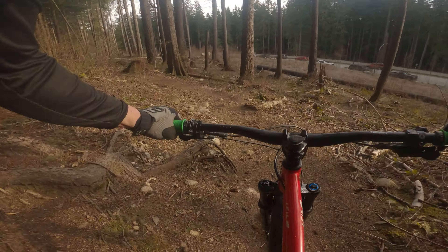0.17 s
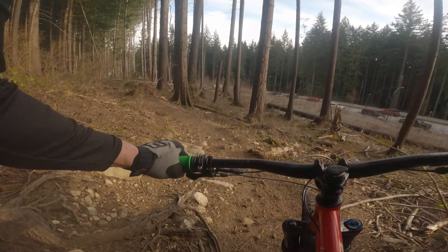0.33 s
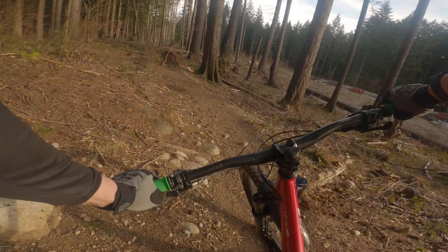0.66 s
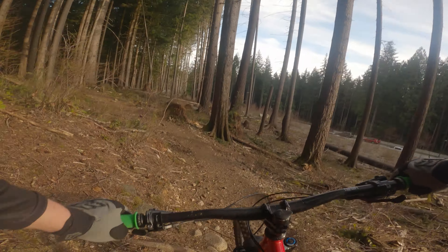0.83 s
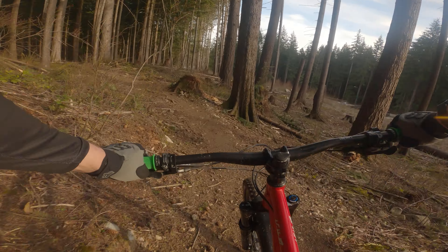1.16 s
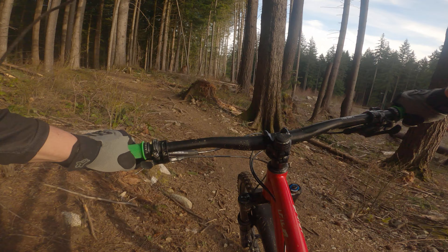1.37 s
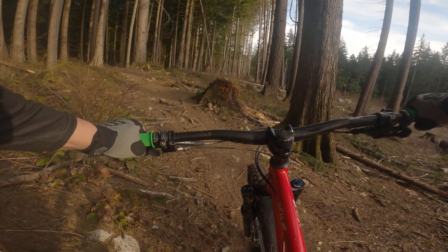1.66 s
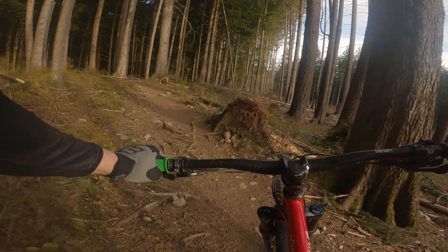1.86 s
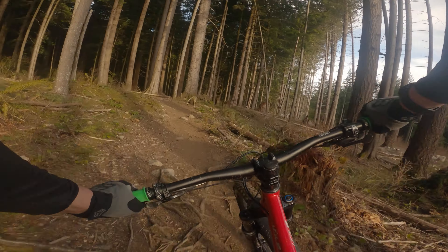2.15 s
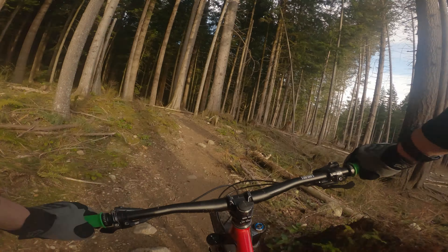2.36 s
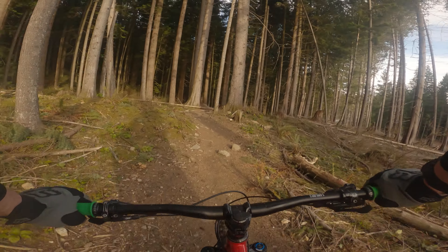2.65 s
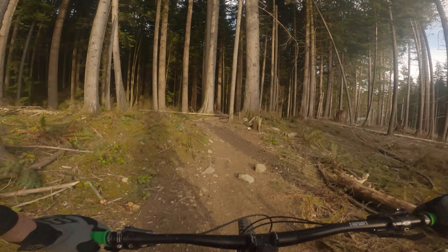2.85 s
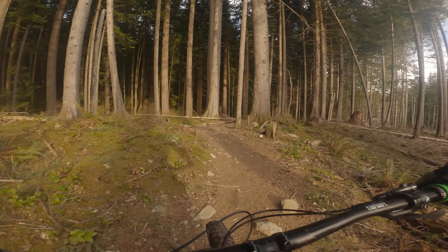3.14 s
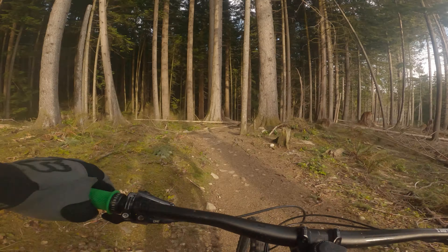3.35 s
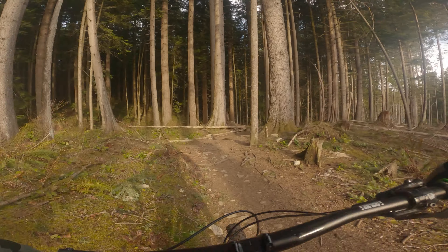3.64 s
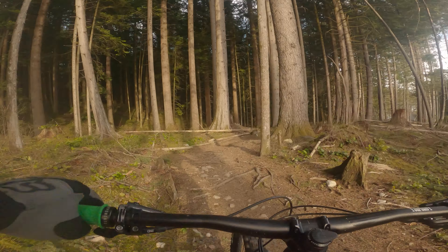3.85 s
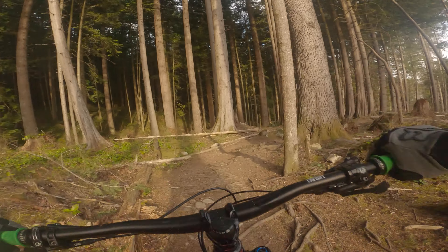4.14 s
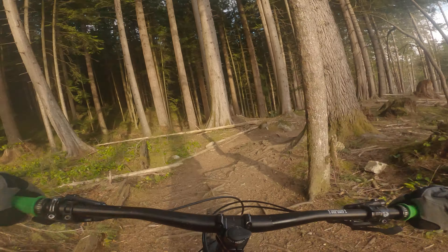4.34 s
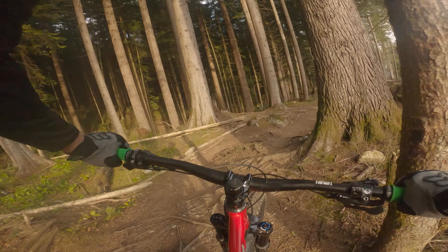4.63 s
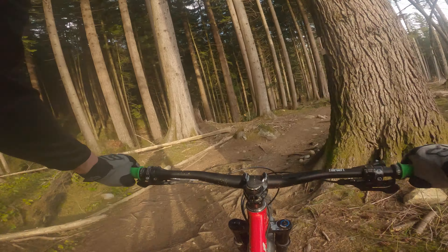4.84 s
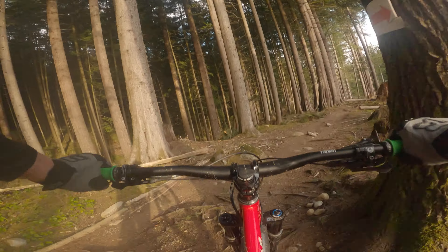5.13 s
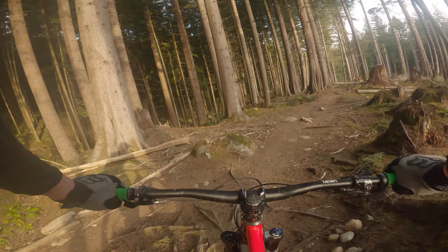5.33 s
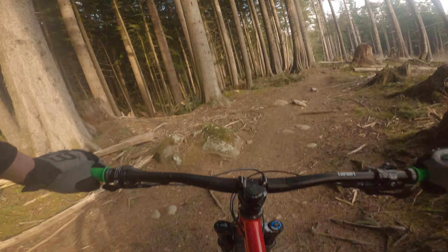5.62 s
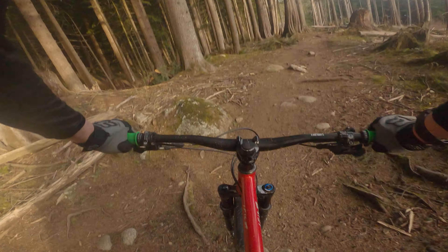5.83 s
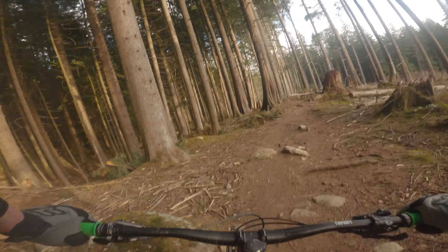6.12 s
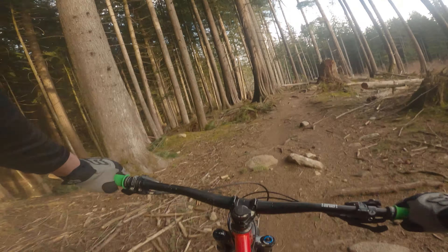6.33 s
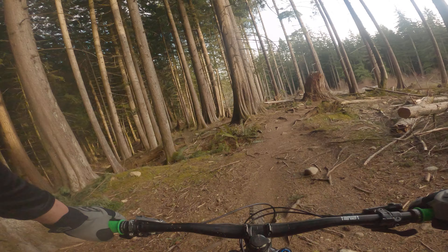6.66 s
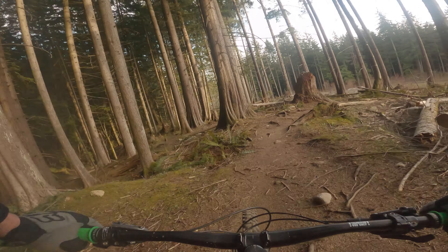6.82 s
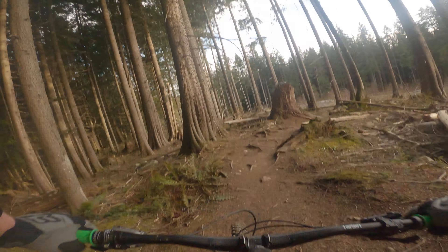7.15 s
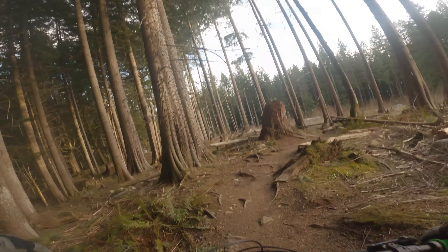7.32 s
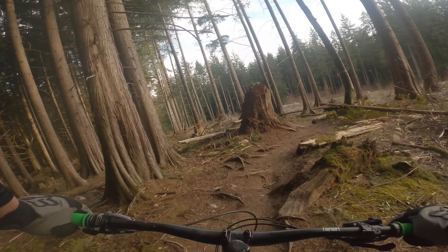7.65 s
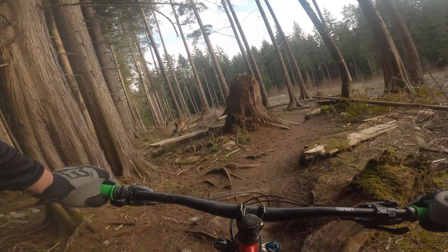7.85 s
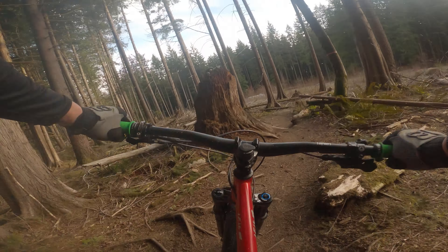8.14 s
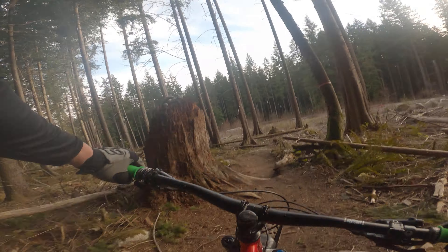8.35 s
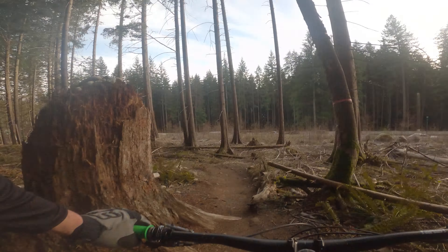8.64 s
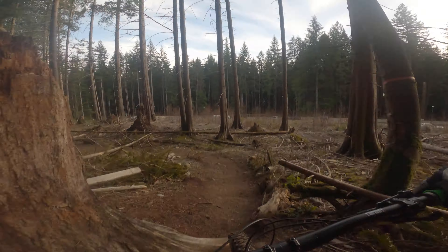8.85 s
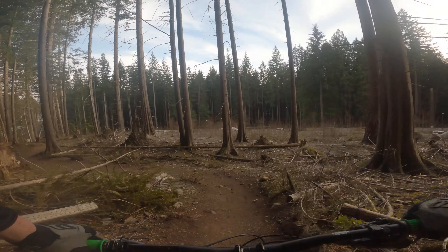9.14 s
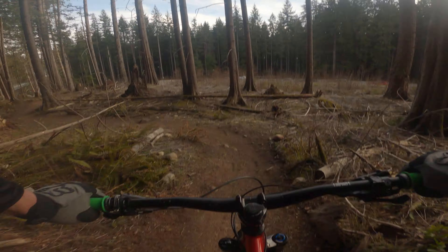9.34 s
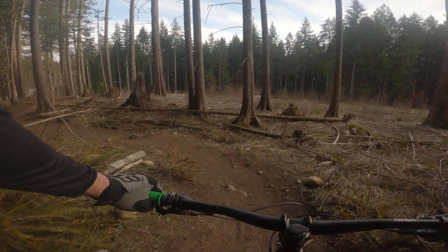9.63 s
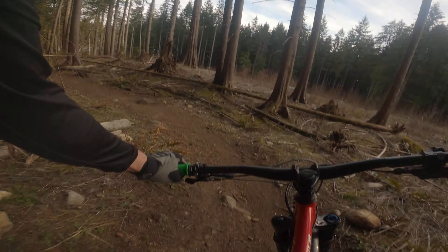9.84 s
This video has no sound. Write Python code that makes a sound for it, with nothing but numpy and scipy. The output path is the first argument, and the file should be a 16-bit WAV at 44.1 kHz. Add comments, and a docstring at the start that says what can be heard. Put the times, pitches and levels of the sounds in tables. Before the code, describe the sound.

Hollow plastic knocks and irregular chatter from a jolted camera mount, over low rumbling wind gusts, airy hiss and gritty tyre crunch on a forest trail.

```python
"""On a rooty dirt trail, a mountain bike rattles along, heard by a camera strapped to the rider's chest.
Wind is shaped noise in gusts; tyres crunch, fizz and snap, made from gritty noise and short bursts.
Every jolt knocks the camera in its mount: a dying chatter sets off the mount's resonances.
Air rush and crunch ring in the camera's case. Sharp ticks, likely from clipping, are bright noise bursts.
Loud knocks make a limiter duck the rest."""
import sys
import numpy as np
from scipy import signal
from scipy.fft import rfft, irfft, next_fast_len
from scipy.io import wavfile
from scipy.ndimage import uniform_filter1d, minimum_filter1d, map_coordinates

SR = 44100
rng = np.random.default_rng(int(sys.argv[2]) if len(sys.argv) > 2 else 0)


def master_out(mix):
    """Clip the mix to full scale and print it as 16-bit PCM to the path in sys.argv[1]."""
    frames = np.transpose(np.atleast_2d(mix))
    ceiling = np.clip(frames, -1, 1)
    pcm = np.round(ceiling * 32767).astype(np.int16)
    wavfile.write(sys.argv[1], SR, pcm)


N = 440118  # length in samples

# how the ride goes: t/s, level of the air rush before gusts sway it/dB, level of the tyre crunch/dB
RIDE = [(0.0, -20, -33.5), (.15, -24, -34.5), (.26, -21, -39.5), (.41, -24.5, -35), (0.48, -23, -36),
        (0.54, -12.5, -27), (0.65, -27, -39.5), (1.28, -25, -40), (2.05, -23.5, -37), (2.24, -17, -36),
        (2.67, -31.5, -37.5), (3.19, -26, -42.5), (3.41, -22, -42.5), (4.48, -24.5, -36.5),
        (4.99, -21.5, -37), (5.16, -22, -38), (5.59, -24.5, -36.5), (5.8, -22, -36), (6.08, -32, -44.5),
        (6.22, -28, -42), (6.4, -31, -46), (7.2, -27.5, -39), (7.28, -25, -34), (7.36, -36, -44),
        (7.72, -24, -42.5), (8.13, -29.5, -38), (8.21, -18.5, -37), (8.28, -19, -30.5), (8.38, -24, -37.5),
        (8.6, -26, -37), (8.87, -24.5, -40), (9.1, -31, -44.5), (9.28, -26.5, -35), (9.42, -25, -39),
        (9.58, -23.5, -37.5), (9.8, -30.5, -38), (9.9, -25, -46), (9.98, -23, -36.5)]
# resonances of the camera's case and its microphone port: f/Hz, width/Hz, level/dB
CASE = [(912, 432, -5.5), (1168, 248, 1.5), (1950, 1890, -7), (3390, 797, -1), (4580, 290, -6.5),
        (5650, 560, -7.5)]


def amp(db):
    """Turn decibels into a plain factor."""
    return 10 ** (np.asarray(db) / 20)


def unit(x):
    """Scale x to an RMS of one."""
    return x / np.sqrt(np.mean(x ** 2) + 1e-20)


def levels(rows):
    """Draw straight lines between table rows: one curve for each column after the time."""
    s, *cols = np.transpose(rows)
    return [np.interp(np.arange(N) / SR, s, db) for db in cols]


def wobble(rate):
    """A smooth random curve through `rate` random points a second."""
    points = rng.standard_normal(int(N * rate / SR) + 4)
    return map_coordinates(points, [np.arange(N) * rate / SR])


def filtered(x, gain_at):
    """Filter x by multiplying its spectrum with gain_at(frequency in Hz)."""
    m = next_fast_len(N + SR // 2)  # spare room at the end lets the ringing die out
    return irfft(rfft(x, m) * gain_at(np.fft.rfftfreq(m, 1 / SR)), m)[..., :N]


def coloured(x, points):
    """Shape the spectrum of x through (Hz, dB) points on a log axis, almost silent beyond the ends."""
    hz, db = np.transpose(points)
    return filtered(x, lambda f: amp(np.interp(np.log(f + 1), np.log(hz + 1), db, -120, -120)))


def response(modes, f):
    """Add up resonances that ring only after they are struck; neighbours have opposite signs."""
    total = 0
    for k, (centre, width, db) in enumerate(modes):
        damping = 1j * f * width
        total = total + (-1) ** k * amp(db) * damping / (centre * centre - f * f + damping)
    return total


def resonant(x, modes):
    """Let x ring through a set of resonances."""
    return filtered(x, lambda f: response(modes, f))


def gritty(rate, spread_db, share):
    """Mix smooth noise with sparse single clicks of uneven size; share is the clicks' part of the power."""
    hit = rng.random(N) < rate / SR
    grains = hit * amp(spread_db * rng.standard_normal(N)) * rng.choice([-1, 1], N)
    share = np.clip(share, 0, 1)
    return np.sqrt(1 - share) * rng.standard_normal(N) + np.sqrt(share) * unit(grains)


def patchy(x, depth_db):
    """Make small random patches of x louder or softer, across both time and frequency."""
    z = signal.stft(x, nperseg=256)[2]
    field = uniform_filter1d(rng.standard_normal(z.shape), size=4, axis=0)
    field = uniform_filter1d(field, size=10, axis=1)
    return signal.istft(z * amp(depth_db * unit(field)), nperseg=256)[1][:N]


def gusts_db():
    """Wind strength in dB: the power of each gust adds to that of the calmer wind between them."""
    # wind between the gusts: t/s, level/dB
    lull = [(0.0, -22.5), (2.64, -27), (3.22, -21.5), (3.67, -16), (5.72, -17), (6.42, -25.5), (8.45, -19),
            (9.01, -30.5), (9.59, -14.5), (9.98, -24)]
    # gusts: t of the peak/s, peak level/dB, length/s
    gusts = [(0, -11, 0.1), (0.196, -13, 0.19), (0.33, -9.5, 0.19), (0.577, -7, 0.16), (0.828, -12.5, 0.13),
             (1.075, -12, 0.35), (1.242, -16, 0.31), (1.435, -10, 0.067), (1.613, -12, 0.4),
             (1.685, -13, 0.06), (1.784, -12.5, 0.2), (2.006, -11.5, 0.21), (2.226, -12, 0.62),
             (2.391, -1, 0.085), (2.631, -4.5, 0.2), (2.926, -10.5, 0.2), (3.223, -13.5, 0.04),
             (3.42, -14.5, 0.14), (3.562, -14.5, 0.31), (3.836, -7, 0.13), (3.987, -9.5, 0.21),
             (4.127, -14, 0.9), (4.326, -13.5, 0.22), (4.4, -12.5, 0.081), (4.596, -17.5, 0.11),
             (4.869, -8, 0.19), (4.97, -12.5, 0.24), (5.204, -12, 0.14), (5.518, -13.5, 0.77),
             (5.747, -12, 0.17), (5.994, -13.5, .17), (6.192, -22.5, 0.37), (6.419, -17.5, 0.16),
             (7.002, -16.5, 0.37), (7.248, -14.5, 0.23), (7.582, -18.5, .3), (7.905, -19.5, 0.13),
             (8.18, -15.5, 0.36), (8.478, -12.5, 0.18), (8.74, -14, 0.18), (8.883, -18.5, 0.26),
             (9.172, -12.5, 0.28), (9.477, -15, 0.21), (9.622, -19, 0.43), (9.98, -15.5, 0.17)]
    edge_db = 11.5  # fall from the peak to half a length away on each side
    t = np.arange(N) / SR
    power = amp(2 * levels(lull)[0])
    for s, db, length in gusts:
        near = slice(max(round((s - length) * SR), 0), round((s + length) * SR))
        fall_db = edge_db * np.abs(2 * (t[near] - s) / length) ** 1.22
        power[near] += amp(2 * (db - fall_db))
    return 10 * np.log10(power)


def wind_buffet(lumps, gust_db):
    """Eddies push the microphone's diaphragm in deep lumps."""
    # colour of the buffeting: f/Hz, relative level/dB
    colour = [(9, -24), (15, 1.5), (43, 4.5), (80, 1), (130, -10), (220, -49.5)]
    noise = coloured(rng.standard_normal(N), colour)
    return amp(gust_db - 2.0) * unit(amp(0.95 * lumps) * noise)


def wind_roar(lumps, gust_db):
    """A higher roar that grows faster than the buffeting as the wind gets stronger."""
    # colour of the roar: f/Hz, relative level/dB
    colour = [(50, -26), (90, 0), (130, -1), (200, -7), (260, -6), (400, -23.5), (600, -26)]
    unsteady = amp(2.1 * lumps + 0.77 * wobble(5) + 1.8 * wobble(30))
    noise = coloured(rng.standard_normal(N), colour)
    return amp(1.392 * gust_db - 0.82) * unit(unsteady * noise)


def air_rush(lumps, gust_db):
    """Air hisses in flutters and rings in the camera's case; gusts lift it a little."""
    # colour of the hiss before the case: f/Hz, relative level/dB
    colour = [(150, -42), (250, 3), (400, 3.5), (700, -6.5), (1200, -8), (2000, -29), (2800, -56.5)]
    follows_gusts = 0.24  # dB per dB
    flutter = amp(2.0 * lumps + 0.38 * wobble(25) + 1.04 * wobble(70))
    grit = patchy(gritty(rate=250, spread_db=3.0, share=0.28), depth_db=1.5)
    rush = unit(resonant(coloured(flutter * grit, colour), CASE))
    rush_db = levels(RIDE)[0] + follows_gusts * (gust_db - gust_db.mean())
    return amp(rush_db) * rush


def wind():
    """Buffeting, roar and air rush share the same lumps and gusts."""
    lumps = wobble(12)
    gust_db = gusts_db()
    return wind_buffet(lumps, gust_db) + wind_roar(lumps, gust_db) + air_rush(lumps, gust_db)


def tyre_grind():
    """Knobs crush grit and needles: a clumpy crunch that rings in the case, and a more even fizz above."""
    # colour of the crunch before the case: f/Hz, relative level/dB
    crunch_colour = [(1200, -31), (1800, 0.5), (2300, 0), (2720, -7.5), (3100, -1.5), (4000, 0.5),
                     (5050, -0.5), (5700, -2), (7000, 0.5), (9000, -21), (12000, -60.5)]
    # colour of the fizz: f/Hz, relative level/dB
    fizz_colour = [(6000, -18), (7500, 2.5), (10000, -3.5), (12500, -8.5), (14000, -13), (15700, -23)]
    # fizz, dull over the soft stretch: t/s, level/dB
    fizz_level = [(0, -53), (.2, -56.5), (.7, -60.5), (1.3, -61), (1.8, -58), (3.12, -58), (3.22, -67.5),
                  (4.2, -65), (4.4, -56), (5.8, -59.5), (6.1, -68), (6.7, -62), (6.9, -59.5), (7.6, -62),
                  (8.35, -57.5), (8.75, -64), (9.3, -60.5), (9.98, -61)]
    grit = patchy(gritty(rate=220, spread_db=4, share=0.28), depth_db=2.2)
    clumps = 1.85 * wobble(27) + 0.97 * wobble(40)
    crunch = unit(resonant(coloured(amp(clumps) * grit, crunch_colour), CASE))
    fizz = unit(coloured(amp(0.33 * clumps) * grit, fizz_colour))
    return amp(levels(RIDE)[1]) * crunch + amp(levels(fizz_level)[0]) * fizz


def twig_snaps():
    """Single snaps under the tyres: quickly fading noise bursts that set off a few resonances."""
    # snaps: t/s, relative level/dB, time to fall by 20 dB/ms
    twigs = [(0.408, -22, 17), (0.575, -12.5, 8.5), (1.4534, -21, 20), (2.34, -20.5, 12), (3.45, -21, 7.1),
             (3.764, -25, 3.3), (3.801, -18, 3.1), (3.962, -21, 3), (4.342, -26, 7.5), (5.151, -20.5, 10),
             (6.723, -26, 8.5), (6.962, -24.5, 7)]
    # resonances of a snap: f/Hz, width/Hz, level/dB
    snap_modes = [(3230, 550, 8), (4750, 1100, 4.5), (6400, 1700, -8), (11000, 4000, -33)]
    out, t = np.zeros(N + SR), np.arange(SR // 20) / SR
    onset = 1 - np.exp(-t / 0.00093)  # rises over about a millisecond
    for s, db, ms in twigs:
        fade = amp(db + 2.5 - 20 * 1000 * t / ms)
        out[round(s * SR):][:len(t)] += fade * onset * rng.standard_normal(len(t))
    return resonant(out[:N], snap_modes)


def tyres():
    """All the tyre sounds: steady grinding and single snaps."""
    return tyre_grind() + twig_snaps()


def clip_ticks():
    """Sharp ticks in hard knocks, likely from clipping: very short bright bursts of noise."""
    # ticks: t/s, relative level/dB
    tick_rows = [(0.4968, -36), (0.8305, -45), (1.1338, -44), (1.4536, -36), (1.8637, -40.5), (2.8175, -39),
                 (5.0135, -39.5), (5.8975, -38), (5.9733, -40), (8.6318, -44), (9.7108, -41)]
    # colour of a tick: f/Hz, level/dB
    colour = [(3000, -43), (5000, 10), (8000, 1), (12000, -2), (15700, -8)]
    fall_ms, raise_db = 2.7, 3.5  # time to fall by 20 dB; added to every tick's level
    out, t = np.zeros(N + SR), np.arange(SR // 100) / SR
    for s, db in tick_rows:
        fade = amp(db + raise_db - 20 * 1000 * t / fall_ms)
        out[round(s * SR):][:len(t)] += fade * rng.standard_normal(len(t))
    return coloured(out[:N], colour)


def rattle():
    """Light jolts at random moments, as rows like those of the hard jolts."""
    # rows: force/dB, chatter length/ms, thud/dB, rap/dB; columns: typical value, random scatter
    light_jolts = [(-20, 2.5), (8, 3), (-8, 4), (-19, 5)]
    count = int(36 * N / SR)  # 36 jolts a second
    typical, scatter = np.transpose(light_jolts)
    rows = typical + scatter * rng.standard_normal((count, len(light_jolts)))
    rows[:, 1] = np.maximum(rows[:, 1], 2)  # no chatter length under 2 ms
    return [(s, *row) for s, row in zip(rng.random(count) * N / SR, rows)]


def mount():
    """Each jolt is a dying chatter in the mount's modes: high modes stop first, soft plastic dulls treble."""
    # hard jolts: t/s, force level/dB, basic chatter length/ms, thud beside the knock/dB, rap beside it/dB
    knocks = [(0.066, -11, 9.2, 1, -24), (0.187, -0.5, 3.3, -6, -30), (.262, 9, 3.3, -6, -12),
              (.309, -5, 5.3, 0.5, -20), (0.349, -4, 4.2, -4, -39), (.497, 14, 3.3, -3.5, 0.5),
              (0.504, 9.5, 8.8, 1, -9), (.747, 3, 7.9, 2.5, -5.5), (0.83, -4.5, 9.2, 3.5, -0.5),
              (0.958, -1, 11, 0, -8), (1.044, -7, 4.5, -10, -15), (1.048, -5, 9, -10, -19),
              (1.093, -12, 6, -6, -8), (1.102, -9.5, 7, -7, -9), (1.127, -13, 8, -14, -20),
              (1.14, -4.5, 8, -18, -11.5), (1.154, -9, 11, -13, -16), (1.175, -18, 10, -3, -17),
              (1.212, -11.5, 9, -12, -26), (1.231, -14, 5, -10, -20), (1.261, -10.5, 8, -7, -25),
              (1.292, -12, 4.6, -10, -25), (1.3, -2.5, 3.6, -12, -25), (1.308, -6.5, 14, -18, -25),
              (1.368, 1.5, 1.6, -26, -29), (1.412, -7, 7.8, -15, -27), (1.425, -11, 9.2, -19, -16),
              (1.457, -7, 7, -10, -20), (1.472, -4.5, 16, -12, -18), (1.551, -7, 8.6, 6.5, -8),
              (1.558, -4.5, 9.3, 1.5, -8), (1.569, 0.5, 4.8, -26, -9.5), (1.639, -5, 7.7, -13, -25),
              (1.656, -9, 6.2, -2, -27), (1.751, -3, 8.4, -2.5, -22), (1.762, -7.5, 6.8, -1.5, -17),
              (1.767, -10, 6, -15, -25), (1.882, -10.5, 8.8, -8, -20), (2.064, -11.5, 8.6, -5, -27),
              (2.096, -11, 7.8, -14, -23), (2.124, -3, 5.8, -13, -27), (2.17, -8, 7.5, -21, -19),
              (2.191, -11, 14, -1, -20), (2.277, -7, 6.6, -3.5, -13), (2.338, -9.5, 8.5, -11, -24),
              (2.346, 0.5, 12, -4, -24), (2.48, -13, 8.6, 0.5, -27), (2.543, -3.5, 14, -10, -16),
              (2.675, -14, 7.2, -10, -16), (2.652, -9, 16, -11, -20), (2.71, -9.5, 13.4, -17, -28),
              (2.81, 3, 8, -5, -11), (2.817, 2.5, 10.6, 0.5, -19), (2.886, -14.5, 6.5, -9, -17),
              (2.941, -9, 7.7, -11, -12), (3.034, -11, 8.8, 2.5, -16), (3.104, -15, 4.2, -16, -17),
              (3.215, -14, 3.4, -11, -29), (3.284, -5.5, 30, -13, -16), (3.341, -6.5, 16, -14, -10),
              (3.36, -9, 10, -12, -16), (3.622, -6.5, 12, -6, -23), (3.668, -5, 22, -13, -36),
              (3.941, 3.5, 3.2, -6, -12), (4.05, -20, 7.6, -14, 1), (4.196, -5, 16, 1, -21),
              (4.23, -11, 10, -2, -5), (4.305, 2.5, 9.6, -15, -10), (4.319, -4, 16, -12, -29),
              (4.379, -11, 21, -3, -11), (4.462, -9, 27, -11, -16), (4.524, -7, 14.4, -4, -14),
              (4.577, -9, 13, -2, -20), (4.589, 1.5, 11, 0, -19), (4.645, -11, 3.1, 1, -35),
              (4.706, -2.5, 3.1, -0.5, -8), (4.776, -3.5, 7, -19, -19), (4.827, -11, 6.6, -17, -5),
              (4.84, -4, 4.1, -16, -23), (4.882, -10.5, 9.4, -12, -23), (4.924, -7.5, 19, -11, -30),
              (5.013, 6, 5.8, -5, -11), (5.084, -7, 18, -1, -12), (5.157, 2.5, 13, -7.5, -39),
              (5.281, -1, 7.7, -3.5, -10.5), (5.349, -1, 11, -9, -16), (5.482, -4, 17, -12, -20),
              (5.529, -6.5, 4, 2.5, -24), (5.638, 6.5, 8.4, 3, -9), (5.669, -9.5, 7.1, 7, -2),
              (5.72, -3, 10.2, 0.5, -7), (5.896, 8, 9.8, 1, -11), (5.974, -0.5, 11.2, -4.5, -7),
              (6.067, -8.5, 7.2, -5.5, -21), (6.107, -0.5, 9, 4.5, -1), (6.179, -12.5, 12, -3, -12),
              (6.24, -15, 10, -2, -20), (6.328, 6.5, 4.5, -8, -6), (6.726, -12, 11, -5, -10),
              (6.735, -9, 4.4, -5, -22), (6.872, -5.5, 4.9, -2.5, -12), (6.879, -11.5, 7, 0, -20),
              (6.905, -12, 6.6, -21, -34), (6.952, -10.5, 6.7, -3, -9), (6.963, -11.5, 17, 0, -16),
              (6.996, -13.5, 9.9, -7, -20), (7.02, -13, 21, -3, -16), (7.146, -15.5, 18, 1, -24),
              (7.168, 8, 9.3, 0, -7.5), (7.253, -9, 16, -12.5, -24), (7.36, -15, 8.7, -5, -19),
              (7.402, 3.5, 5.3, -8, -9), (7.409, -5, 9, 3.5, -8), (7.627, -8, 4.9, -14, -29),
              (7.769, -10, 26, -3.5, -12), (8.171, -4, 7.4, -19, -16), (8.193, -2.5, 8, 1.5, -27),
              (8.357, -22, 3.4, -18, 10.5), (8.387, 0.5, 7.7, -9, -24), (8.396, -5.5, 16, 3, -27),
              (8.464, -3, 8.1, -11, -14), (8.632, 9, 7.1, -1, -4.5), (8.718, -13.5, 9, 5, 6),
              (8.849, -0.5, 13, 0, -5), (8.856, -2, 9.3, 5.5, -15), (8.931, -4, 11, -0.5, -3.5),
              (8.973, -12, 31, -2.5, -20), (9.088, 4, 8.6, -4, -12), (9.113, -15, 7, 11.5, -15),
              (9.172, -10, 7.6, 3, -6), (9.18, -10, 8.1, 4, -10), (9.252, -15, 12, 4, -2.5),
              (9.37, 0, 17.7, 0, -11), (9.451, -7.5, 8.6, -8.5, -3.5), (9.467, -7.5, 18, 3, -0.5),
              (9.556, -12, 12, -3, -4), (9.624, -5.5, 5, -1, -12), (9.631, 6, 4.8, 6.5, -2),
              (9.709, -5.5, 10, 9, 4), (9.859, -6, 7.6, -24, -37), (9.867, 5, 4.5, -22, -37),
              (9.881, 0, 6, -6, -7), (9.955, -9, 13, 3, -5)]
    # resonances of the thud: f/Hz, width/Hz, level before dulling/dB
    thud_modes = [(122, 130, -8.5), (251, 94, -1), (523, 164, -0.5)]
    # resonances of the knock: f/Hz, width/Hz, level before dulling/dB
    knock_modes = [(784, 192, -5.5), (1160, 141, 3.5)]
    # resonances of the rap: f/Hz, width/Hz, level before dulling/dB
    rap_modes = [(1570, 445, 0.5), (1960, 630, -7)]
    # resonances of the click: f/Hz, width/Hz, level before dulling/dB
    click_modes = [(3320, 340, 0), (4550, 1200, -13)]
    groups = (thud_modes, knock_modes, rap_modes, click_modes)
    lasts = np.array([[1.2], [1.05], [.7], [.6]])  # chatter length of each group, in basic lengths
    click_base_db, click_follows = -14, 0.54  # click beside the knock; how far it grows with the rap
    blow, blow_grows = 1.46, 0.36  # first contact over the chatter; sharper in hard jolts (dB per dB)
    detune_share = .045  # scatter of the modes from jolt to jolt
    bounces_per_s, ragged_db = 260, 4  # contacts inside the chatter and their uneven size

    out, t = np.zeros(N + SR), np.arange(SR // 10) / SR
    jolts = knocks + rattle()
    f = np.fft.rfftfreq(len(t), 1 / SR)
    detune = np.exp(detune_share * rng.standard_normal((len(jolts), 4)))
    bounces = rng.standard_normal((len(jolts), int(bounces_per_s * t[-1]) + 2))

    def dull(hz):
        """Soft plastic lets less and less through above hz."""
        return (1 + 1.4j * f / hz - (f / hz) ** 2) ** -2

    soft = np.array([dull(1860), dull(1580), dull(2700), dull(4900)])
    for (s, db, ms, thud_db, rap_db), shift, bounce in zip(jolts, detune, bounces):
        modes = soft * [response(group, f * k) for group, k in zip(groups, shift)]
        ragged = amp(ragged_db * np.interp(t * bounces_per_s, np.arange(len(bounce)), bounce))
        done = 1000 * t / (ms * lasts)  # 1 after one chatter length
        fade = amp(-5 * done) + 0.43 * amp(-60 * t / 0.025)
        shape = fade * np.clip(3 * (1.2 - done), 0, 1)  # the chatter stops at 1.2 lengths
        force = ragged * shape * rng.standard_normal(shape.shape)
        force[:, :SR // 4000] += blow * amp(blow_grows * db)  # first contact, a quarter millisecond
        parts = irfft(rfft(force) * modes, len(t))
        parts /= np.abs(parts).max(axis=1, keepdims=True)
        click_db = click_base_db + click_follows * rap_db
        gains = amp(db + np.array([thud_db, 0, rap_db, click_db]))
        jolt = gains @ parts
        peak = 0.95 * np.linalg.norm(gains)
        out[round(s * SR):][:len(t)] += jolt * peak / np.abs(jolt).max()
    return out[:N]


def scene():
    """Wind, tyres, ticks and the knocking mount together, in one channel."""
    return (wind() + tyres() + clip_ticks() + mount())[None]


def limiter_db(x, top_db, ahead, attack, hold, release_db):
    """Gain in dB that keeps x near top_db: drops fast, holds (times in s), climbs release_db a second."""
    need = np.minimum(0, top_db - 20 * np.log10(np.abs(x) + 1e-9))
    span = int((ahead + hold) * SR)
    lowest = minimum_filter1d(np.pad(need, (span, span)), span)
    held = lowest[span + int(ahead * SR) - span // 2:][:N]
    climb = release_db * np.arange(N) / SR
    gain = climb + np.minimum.accumulate(held - climb)
    return uniform_filter1d(gain, max(int(attack * SR), 1))


def record(dry):
    """A limiter that ignores bass ducks bass less and treble more; a second rounds peaks, the rest clips."""
    bass = filtered(dry[0], lambda f: 1 / (1 + (f / 200) ** 4))
    treble = filtered(dry[0], lambda f: 1 - 1 / (1 + (f / 5000) ** 4))
    middle = dry[0] - bass - treble
    gain_db = limiter_db(dry[0] - bass, top_db=0.0, ahead=0.0017, attack=0.001, hold=0.029, release_db=178)
    lagging_db = uniform_filter1d(gain_db, size=401, origin=200)  # the treble ducks a few ms late
    x = amp(0.43 * gain_db) * bass + amp(gain_db) * middle + amp(1.4 * lagging_db) * treble
    x = x * amp(limiter_db(x - treble, top_db=0.7, ahead=.003, attack=.003, hold=.003, release_db=600))
    x = x / (1 + np.abs(x) ** 24) ** (1 / 24)  # clip with slightly rounded corners
    return filtered(x, lambda f: f < 15750)[None]  # nothing above 15750 Hz


dry = scene()
out = record(dry)
master_out(out)
```